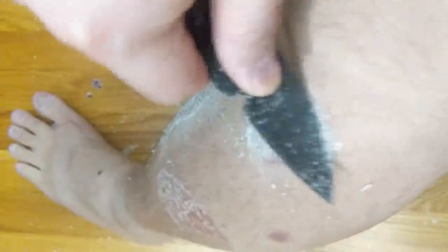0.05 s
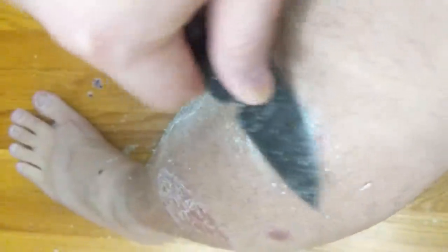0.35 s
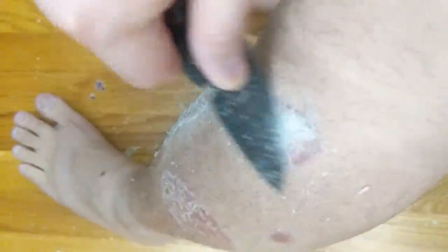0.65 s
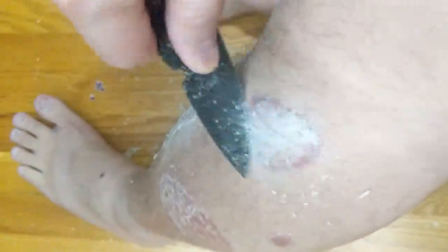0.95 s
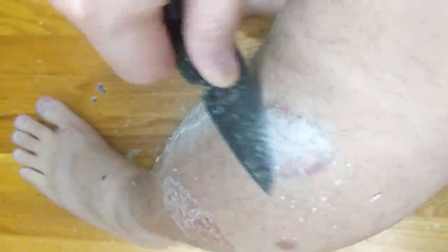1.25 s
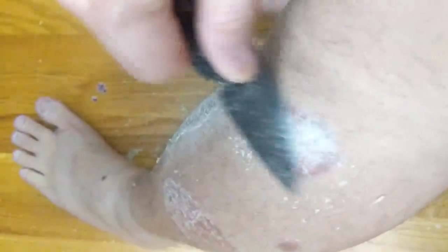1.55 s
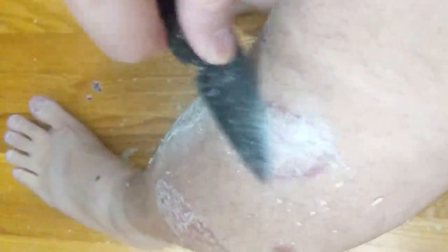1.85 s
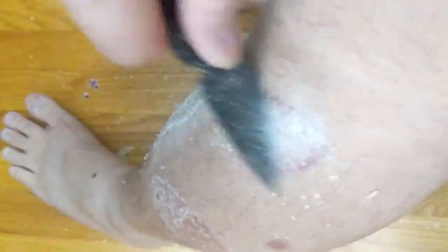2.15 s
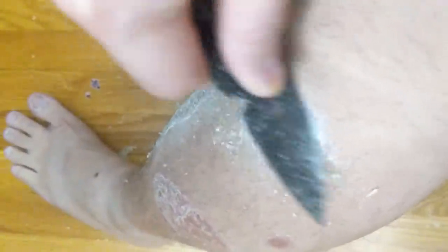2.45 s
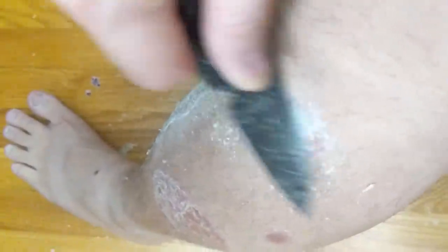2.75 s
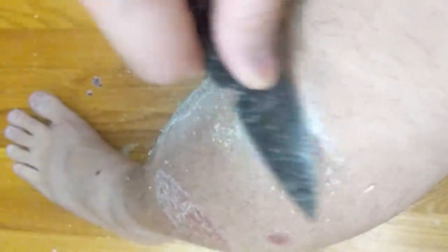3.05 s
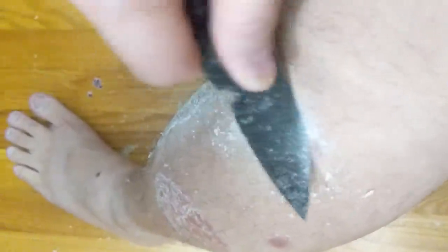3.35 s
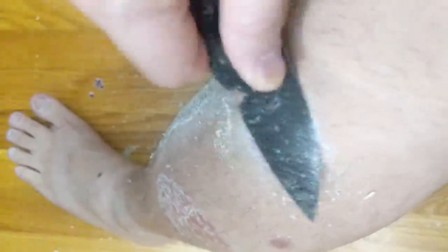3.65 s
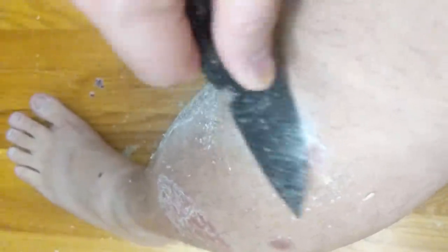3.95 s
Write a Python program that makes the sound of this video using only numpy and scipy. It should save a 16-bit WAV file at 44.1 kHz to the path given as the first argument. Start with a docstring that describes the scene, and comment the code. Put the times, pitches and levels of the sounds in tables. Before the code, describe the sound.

A knife blade scrapes quickly back and forth over dry, scaly skin.

```python
"""A short steel blade scrapes to and fro over dry, scaly skin, about seven strokes a second, slowing
near the end. Countless tiny scales catch on the edge: they hiss and set the hand-damped blade ringing,
with a new colour on each stroke and a slight lift in pitch along it. Between strokes the flat of the
blade brushes the skin, and now and then a flake snaps off. Underneath lies the quiet bed of a small
room: soft air and a low hum."""
import sys
import numpy as np
from scipy import signal
from scipy.fft import rfft, irfft
from scipy.io import wavfile

SR = 44100
rng = np.random.default_rng(int(sys.argv[2]) if len(sys.argv) > 2 else 0)


def master(y):
    """Save y as 16-bit WAV."""
    cut = np.clip(np.atleast_2d(y).T, -1, 1)
    pcm = np.round(cut * 32767)  # scale
    wavfile.write(sys.argv[1], SR, pcm.astype(np.int16))


N = 176400
TIME = np.arange(N) / SR

# blade strokes: t/s, length/s, crest position/share of length, crest level/dB, swell to the crest/dB,
# then extra drive/dB for each of blade modes 1 to 4
BLADE_STROKES = [(0.066, 0.07, 0.62, -46.5, 6.5, -3, 5, -3, 0),
                 (0.228, 0.08, 0.11, -43, 7, -1.5, 2.5, -3.5, 0),
                 (0.381, 0.056, 0.7, -49, 0, -16, 5, 1, 3.5),
                 (0.527, 0.067, 0.36, -42, 8.5, 1, 4.5, 1, 3.5), (0.665, 0.06, 0.85, -48, 5, -2, 4, 2, 3),
                 (0.775, 0.066, 0.28, -43, 9.5, 0, 3, -1, 3),
                 (0.916, 0.069, 0.76, -46, 6.5, -4, 6, 0.5, -3),
                 (1.042, 0.05, 0.59, -46.5, 3.5, 1, 5.5, 2.5, 1),
                 (1.168, 0.07, 0.6, -42.5, 10.5, 2.5, 4, 4.5, 0),
                 (1.312, 0.07, 0.29, -44.5, 6, 2, 3, -0.5, 0), (1.452, 0.065, 0.5, -47.5, 6, 0, 6, 2, 0),
                 (1.569, 0.061, 0.55, -47, 6, 1.5, 2, 0.5, 2),
                 (1.717, 0.046, 0.41, -50.5, 4.5, -11, 9.5, 0, -3),
                 (1.839, 0.045, 0.63, -44.5, 4, -3, 1.5, 2, 2),
                 (1.979, 0.073, 0.48, -45.5, 7.5, -11, 4.5, -4.5, 3),
                 (2.139, 0.074, 0.41, -41, 12, 1, 2, 1.5, 5.5), (2.301, 0.071, 0.54, -47, 6, 0, 4, -5, 6),
                 (2.438, 0.064, 0.46, -42.5, 8.5, -3, -1, 1.5, 6),
                 (2.582, 0.072, 0.68, -46.5, 7.5, -1.5, 4, 0.5, -5),
                 (2.711, 0.067, 0.8, -46, 2, 5, -4, -1.5, 2.5),
                 (2.865, 0.078, 0.71, -45.5, 4, 2.5, 2.5, 4, 3),
                 (3.008, 0.065, 0.43, -52, -0.5, 2.5, -5, 1.5, 3),
                 (3.146, 0.083, 0.59, -43.5, 7.5, 6, -3, 4.5, 8),
                 (3.277, 0.028, 0.76, -52, 5.5, -14, 1, -3, -5),
                 (3.436, 0.086, 0.63, -42.5, 9, 7, -3, 2, 5.5),
                 (3.725, 0.075, 0.36, -42.5, 9.5, 1, 1, 2, 2.5),
                 (3.997, 0.07, 0.5, -44.5, 5.5, -2, -7, -1, 4)]
# ring of the hand-held blade: f/Hz, width/Hz, relative level/dB
BLADE_MODES = [(2384, 122, -3.5), (3530, 149, -2.5), (4404, 252, 4.5), (6293, 356, -5.5), (7877, 256, -2),
               (4655, 145, -2.5), (5150, 250, -9.5), (9980, 280, -13), (11490, 620, -14)]
# EQ of the dry scale hiss: f/Hz, relative level/dB
HISS_EQ = [(500, -23), (1100, -11.5), (1700, -8), (2000, 0.15), (5200, 2.5), (7300, 1), (8500, -6.5),
           (14000, -4), (15500, -8)]
# flakes snapping off: t/s, peak level of the crack/dB
FLAKE_SNAPS = [(0.2365, -30), (1.2385, -28), (2.0448, -29), (2.3700, -31), (3.511, -30.5), (3.784, -32)]
# envelope of the flat of the blade brushing the skin: t/s, level/dB
BRUSH_ENVELOPE = [(0, -64), (.07, -74), (1.1, -73), (1.28, -63), (1.55, -67.5), (1.7, -70), (3.4, -75),
                  (3.7, -72), (3.89, -65.5), (4, -70.5)]
# light touches that tick the blade: t/s, drive level/dB
BLADE_TOUCHES = [(3.939, -35)]
# EQ of the room air: f/Hz, relative level/dB
AIR_EQ = [(20, -27), (35, -7.5), (60, -0.5), (125, 0), (190, 5.5), (290, -1.5), (600, -4.5), (1000, -9.5),
          (2000, -13.5), (4000, -22.5), (15500, -25)]
# tones of the hum: f/Hz, level before the envelope/dB
HUM_TONES = [(64, -79), (102, -69.5), (152, -73.5), (284, -75.5)]
# envelope of the hum: t/s, gain/dB
HUM_ENVELOPE = [(0, -10), (1.4, 2.5), (2.8, 1.5), (4, -1)]

ATTACK_S, RELEASE_S, EDGE_DROP_DB = 0.014, 0.040, 17   # bite and let-go: time to move by this many dB
RING_DB, RING_RISE = 11.5, 0.01   # ring gain; share by which its pitch climbs along a stroke
LIFT_LOSS_DB = 10   # drive the lowest mode loses as the edge lifts
CONTACT_SPREAD_DB = 1.3   # stroke-to-stroke scatter in the drive of modes 5 and up
SCALES_PER_S, SCALE_SPREAD_DB = 14000, 4   # density and unevenness of the catches
JUDDER_HZ, JUDDER_DB = 36, 1.17   # uneven drag
HISS_DB = -4.5
CRISP_DB, CRISP_FADE_DB_PER_S, CRISP_HZ, CRISP_WIDTH_HZ = -10, 3.5, 8400, 2600
SNAP_DECAY_S, SNAP_LOW_CUT_HZ, SNAP_RING_DB = .0001, 3000, -9
BRUSH_HZ, BRUSH_WIDTH_HZ, BRUSH_RING_DB = 4620, 2800, -5.5
TOUCH_HIGH_DB = 10   # a touch drives the fourth mode hardest
ROOM_T60_S, ROOM_DB, ROOM_TOP_HZ = 0.099, -12, 6860
AIR_DB, HUM_WAVER_DB, HUM_PITCH_SPREAD_HZ = -61, 2.5, 2.49
HIGH_CUT_HZ = 15750


def scraping():
    """Each stroke drags the edge over the scales: the blade rings, bending up a touch, over dry hiss."""
    on_blade, on_skin = friction(), friction()
    ringing, drag = np.zeros(N), np.zeros(N)
    scatter_db = CONTACT_SPREAD_DB * rng.standard_normal((len(BLADE_STROKES), len(BLADE_MODES)))
    for stroke, rest_db in zip(BLADE_STROKES, scatter_db):
        start, length, crest, level_db, swell_db, lowest_db, *next_db = stroke
        press = pressure(start, length, crest, level_db, swell_db)
        near = (TIME > start - .05) & (TIME < start + .22)
        along = np.clip((TIME[near] - start) / length, 0, 1)
        lifted = np.clip((TIME[near] - start - length) / RELEASE_S, 0, 1)
        drive_db = [lowest_db - LIFT_LOSS_DB * lifted, *next_db, *rest_db]
        ringing[near] += blade((on_blade * press)[near], drive_db, pitch=1 + RING_RISE * (along - .5))
        drag += press
    hiss = from_db(HISS_DB) * cut(colour(on_skin * drag, HISS_EQ), 270, "high")
    # loose scales add a crisp top that fades as they wear off
    loose_scales = from_db(CRISP_DB - CRISP_FADE_DB_PER_S * TIME)
    crisp = loose_scales * drag * unit_rms(resonate(friction(), CRISP_HZ, CRISP_WIDTH_HZ))
    return ringing + hiss + crisp


def pressure(start, length, crest, level_db, swell_db):
    """Envelope of one stroke: the edge bites, leans in up to a crest, eases and lets go."""
    end = start + length
    swell = np.interp(TIME, [start, start + crest * length, end], [-swell_db, 0, -swell_db])
    away = np.maximum(start - TIME, 0) / ATTACK_S + np.maximum(TIME - end, 0) / RELEASE_S
    return from_db(level_db + swell - EDGE_DROP_DB * np.minimum(away, 10))


def friction():
    """The grain of the scrape: dense random catches of the edge on scales, in uneven clumps."""
    sizes = from_db(SCALE_SPREAD_DB * np.minimum(rng.exponential(1, N), 4))
    polarity = rng.choice([-1, 1], N)
    catches = rng.random(N) < SCALES_PER_S / SR
    judder = from_db(JUDDER_DB * drift(JUDDER_HZ))
    return unit_rms(sizes * polarity * catches * judder)


def blade(force, drive_db=(), pitch=1):
    """The steel rings in its modes; the point of contact sets how hard each is driven."""
    drive = list(drive_db) + [0] * (len(BLADE_MODES) - len(drive_db))
    return sum(mode(force * from_db(RING_DB + db + extra_db), hz * pitch, width)
               for (hz, width, db), extra_db in zip(BLADE_MODES, drive))


def flakes():
    """A flake snaps off with a tiny bright crack that also pings the blade."""
    cracks = np.zeros(N)
    age = np.arange(SR // 200) / SR
    for start, db in FLAKE_SNAPS:
        burst = rng.standard_normal(len(age)) * np.exp(-age / SNAP_DECAY_S)
        crack = cut(cut(burst, SNAP_LOW_CUT_HZ, "high"), HIGH_CUT_HZ, "low")
        onset = int(start * SR)
        cracks[onset:onset + len(age)] += from_db(db) * crack / abs(crack).max()
    return cracks + from_db(SNAP_RING_DB) * blade(cracks)


def brushing():
    """Light contact fills the gaps between strokes: soft hiss, a hint of ring, a small high tick."""
    drag = from_db(np.interp(TIME, *np.transpose(BRUSH_ENVELOPE)))
    touch = np.zeros(N)
    for start, db in BLADE_TOUCHES:
        touch[int(start * SR)] = from_db(db)
    hiss = drag * unit_rms(mode(friction(), BRUSH_HZ, BRUSH_WIDTH_HZ))
    ringing = blade(from_db(BRUSH_RING_DB) * drag * friction())
    tick = blade(touch, drive_db=[0, 0, 0, TOUCH_HIGH_DB])
    return hiss + ringing + tick


def room(x):
    """The small room's reflections: a short, dull tail."""
    decay = from_db(-60 * np.minimum(TIME / ROOM_T60_S, 4))
    tail = cut(rng.standard_normal(N) * decay, ROOM_TOP_HZ, "low")
    return from_db(ROOM_DB) * signal.fftconvolve(x, tail / np.linalg.norm(tail))[:N]


def room_tone():
    """The bed: soft air and a low hum that wavers in level and pitch."""
    hum = np.zeros(N)
    for hz, db in HUM_TONES:
        waver = from_db(HUM_WAVER_DB * drift(rate_hz=1.5))
        pitch_hz = hz + HUM_PITCH_SPREAD_HZ * drift(rate_hz=5.3)
        hum += from_db(db) * unit_rms(waver * np.sin(2 * np.pi * np.cumsum(pitch_hz) / SR))
    hum *= from_db(np.interp(TIME, *np.transpose(HUM_ENVELOPE)))
    air = from_db(AIR_DB) * colour(rng.standard_normal(N), AIR_EQ)
    return hum + air


def mode(x, hz, width_hz):
    """A steep-sided resonance whose pitch can glide; unity gain at the peak."""
    r = np.exp(-np.pi * width_hz / SR)
    carrier = np.exp(2j * np.pi * np.cumsum(hz * np.ones(len(x))) / SR)
    baseband = x * carrier.conj() + 1e-18 * (1 + 1j)
    return 2 * (carrier * signal.lfilter([(1 - r) ** 2], [1, -2 * r, r * r], baseband)).real


def resonate(x, hz, width_hz):
    """A resonant band-pass; unity gain at the peak."""
    r = np.exp(-np.pi * width_hz / SR)
    feedback = [1, -2 * r * np.cos(2 * np.pi * hz / SR), r * r]
    return signal.lfilter(np.array([1, 0, -1]) * (1 - r * r) / 2, feedback, x + 1e-18)


def colour(x, eq):
    """Apply an EQ curve (f/Hz, level/dB), keeping the power of white noise."""
    hz, db = np.transpose(eq)
    bin_hz = np.maximum(np.arange(N // 2 + 1) * SR / N, 1)
    gain = unit_rms(from_db(np.interp(np.log(bin_hz), np.log(hz), db)))
    return irfft(rfft(x) * gain, N)


def cut(x, hz, kind):
    """Gentle high- or low-pass."""
    return signal.sosfilt(signal.butter(2, hz, kind, fs=SR, output="sos"), x)


def drift(rate_hz):
    """Smooth random modulation with a spread of about 1."""
    r = np.exp(-2 * np.pi * rate_hz / SR)
    return unit_rms(signal.lfilter([1], [1, -2 * r, r * r], rng.standard_normal(N + SR)))[SR:]


def from_db(db):
    """Decibels to gain."""
    return 10 ** (np.asarray(db) / 20)


def unit_rms(x):
    """Normalise to rms 1."""
    return x / np.sqrt(np.mean(x ** 2) + 1e-20)


def scene():
    """The mono mix: blade and skin up close, the room behind."""
    close = scraping() + brushing() + flakes()
    return (close + room(close) + room_tone())[None]


def record(dry):
    """A steep high cut on the whole mix."""
    return signal.sosfilt(signal.ellip(12, .1, 70, HIGH_CUT_HZ, fs=SR, output="sos"), dry)


dry = scene()
out = record(dry)
master(out)
```